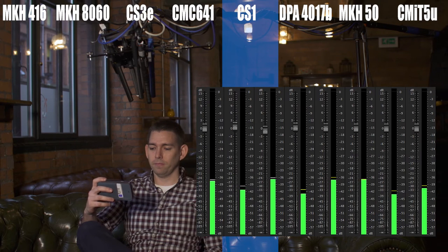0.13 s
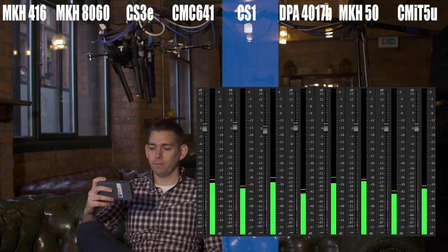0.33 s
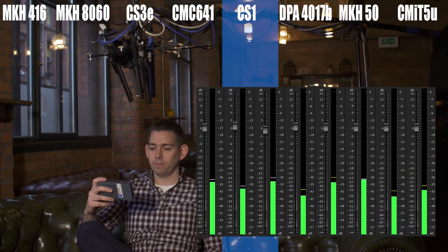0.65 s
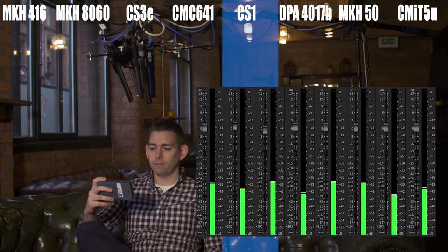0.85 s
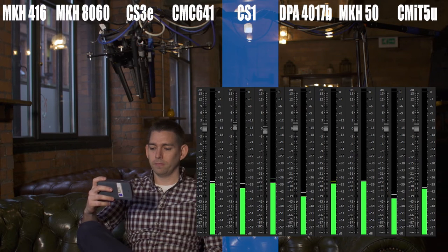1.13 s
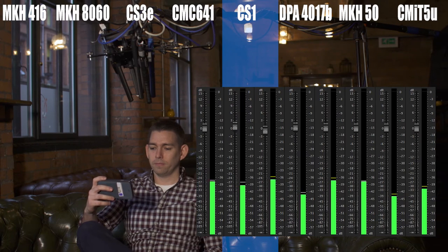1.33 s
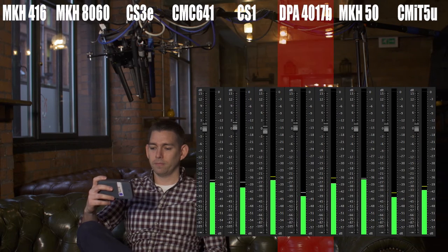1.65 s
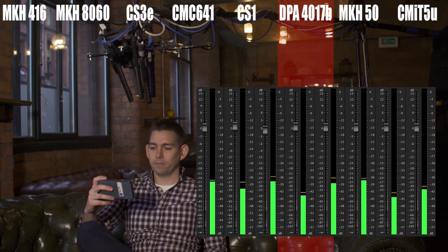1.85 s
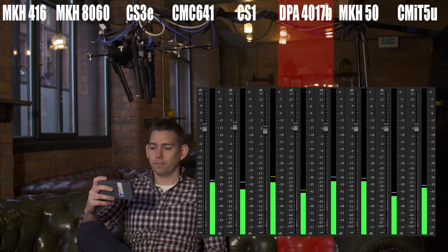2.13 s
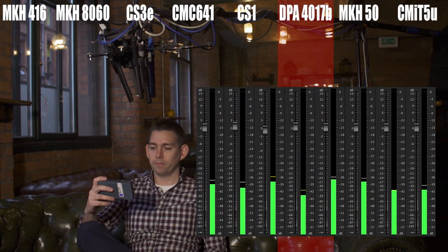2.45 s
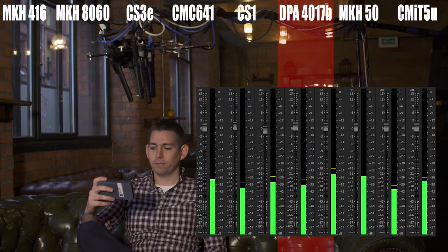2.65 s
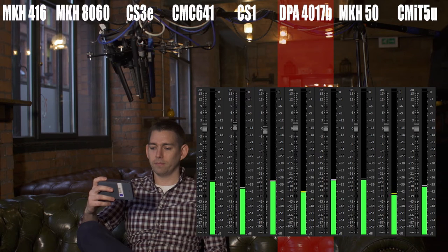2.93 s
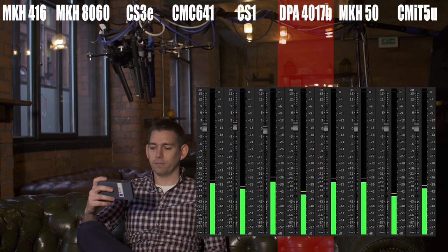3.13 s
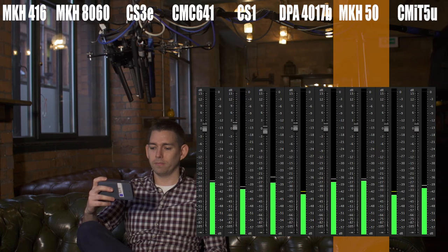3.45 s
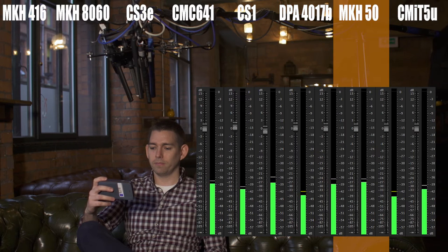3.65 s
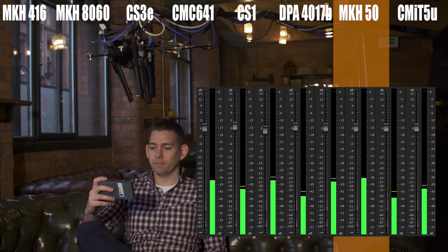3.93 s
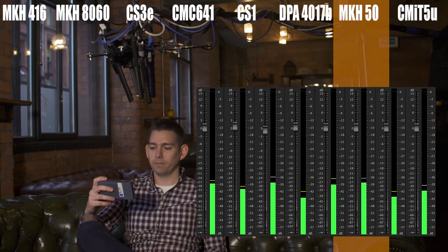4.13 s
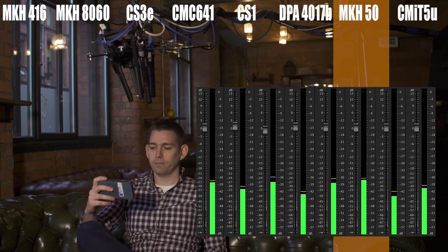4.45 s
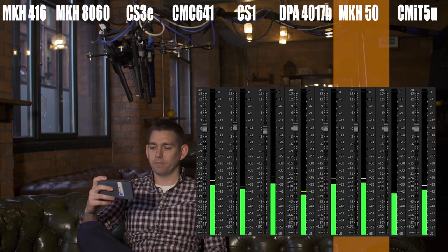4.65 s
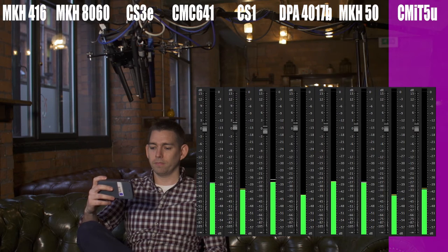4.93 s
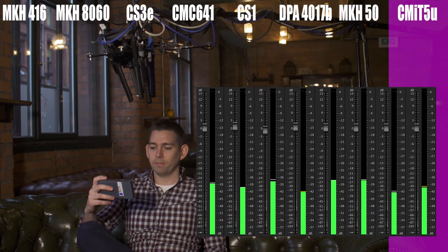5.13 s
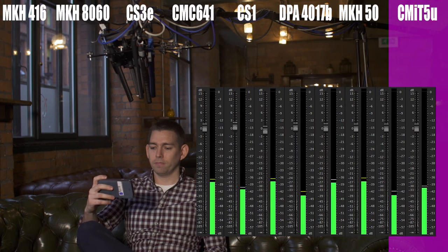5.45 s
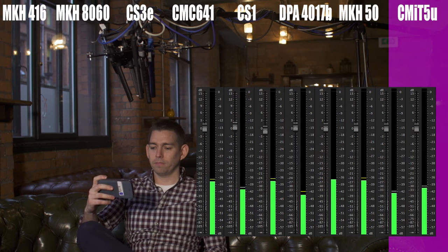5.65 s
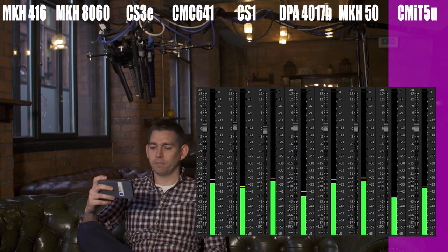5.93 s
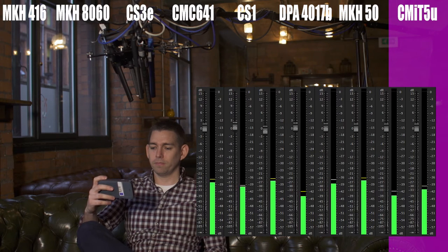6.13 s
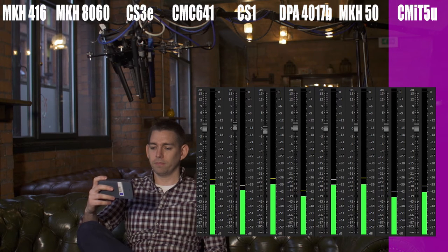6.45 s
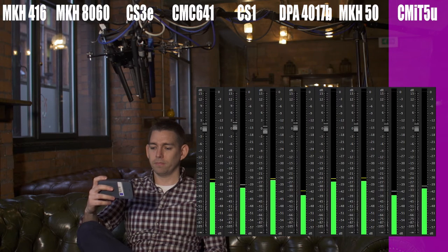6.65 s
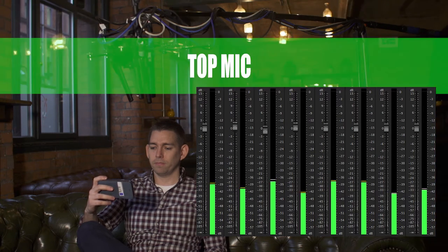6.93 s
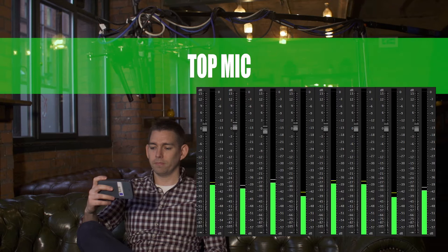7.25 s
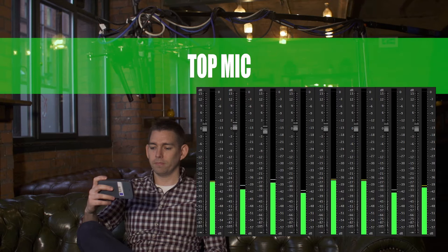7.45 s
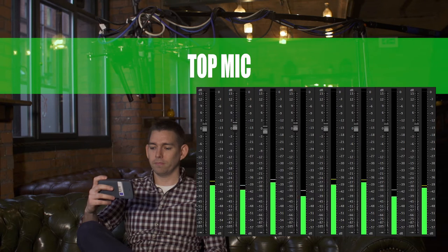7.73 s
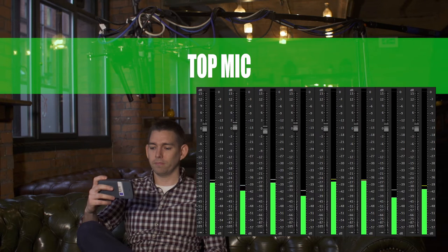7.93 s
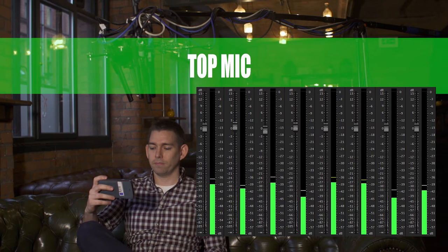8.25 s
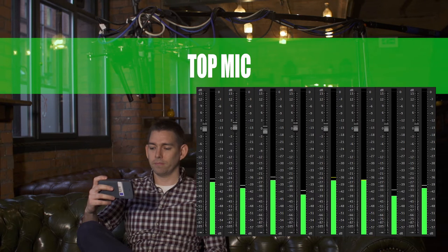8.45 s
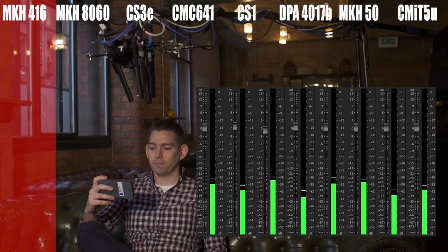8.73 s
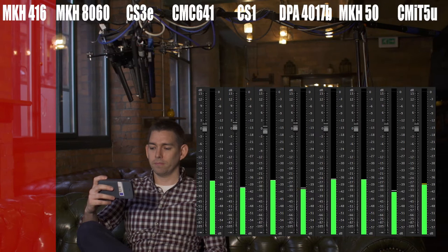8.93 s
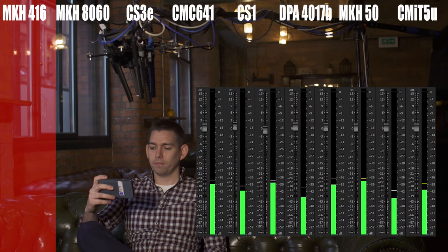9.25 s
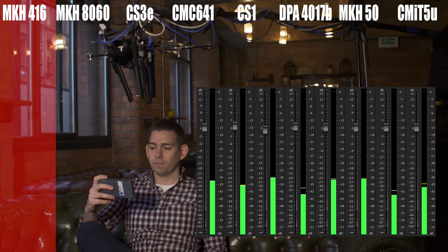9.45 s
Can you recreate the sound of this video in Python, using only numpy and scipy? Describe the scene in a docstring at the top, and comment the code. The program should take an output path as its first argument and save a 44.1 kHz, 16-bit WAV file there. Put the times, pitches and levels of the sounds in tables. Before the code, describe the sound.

Quiet room ventilation drone heard from changing microphone positions, with small clicks, two faint low thuds and a louder pulsing section before the end.

```python
"""A ceiling air conditioner in a quiet room, on six microphones in turn: summed sines hum, shaped noise hisses.
Short struck modes tick at 0.2 s; hard switches with a waveform jump follow at 1.5, 3.3 and 4.9 s.
Low decaying swings of the floor thud softly at 2.4 s and, fainter, at 5.4 s.
At 6.9 s the microphone across the room takes over: its hum beats strongly with a tone just below,
and high-passed noise swells briefly at 7.8 s. At 8.6 s the last switch returns to the edge of the cluster."""
import sys
import numpy as np
from scipy import signal
from scipy.fft import rfft, irfft
from scipy.io import wavfile

SR = 44100
rng = np.random.default_rng(int(sys.argv[2]) if len(sys.argv) > 2 else 0)


def pcm_store(signal):
    """Save signal as 16-bit PCM."""
    levels = np.round(np.clip(np.atleast_2d(signal), -1, 1) * 32767)
    wavfile.write(sys.argv[1], SR, levels.astype(np.int16).T)


N = 423360

# where each of the six microphones stands:
# 0 at the edge of the cluster overhead, 1 inside it, 2 across the room
MIC_SPOTS = [0, 1, 1, 1, 2, 0]
# the six microphones; all but the hum column colour only the air noise:
# (level [dB], rumble [dB], bass shelf [dB], boom [dB], treble shelf [dB], presence [dB],
#  top shelf [dB], bass cut [Hz], hum level [dB rms])
MICROPHONES = [(-1.5, 15, -0.6, 3, 1.1, -1.5, 2.5, 12, -44.5), (-3.5, -4, 3, 0.5, -1, 0.5, -6, 17, -41.5),
               (-3, 18, -2.5, -1.7, 0.1, 2, 5, 17, -53), (-2.5, 8, -0.2, -0.8, -1.5, -1, -0.5, 18, -47.5),
               (10, -3, -0.55, -1.5, 1.5, 0, -3, 43, -31.5), (-2.5, 6, -0.5, 1, 1, -0.1, 2, 26, -43)]
# motor tone above the hum, at each microphone: (level [dB rms])
MOTOR_LEVELS = [-55, -58, -62, -57.5, -48.5, -55]
# tone just under the hum, at each microphone: (level [dB rms])
BEAT_LEVELS = [-67, -65, -64.5, -72, -42.5, -73]
# fainter motor tones: (frequency [Hz], level at each of the six microphones [dB rms])
FAINT_TONES = [(28.05, -64, -68, -66, -72, -76, -74), (49.55, -66, -69, -71, -79, -70, -68),
               (91.05, -64, -71, -74, -69, -63, -66), (130.8, -68, -75, -84, -75, -72, -69),
               (192.4, -66, -67, -69, -68, -53, -74), (219.1, -67, -64.5, -66.5, -66, -70, -67),
               (200.06, -74, -74, -80, -80, -58, -76), (243.5, -69, -71, -74, -73, -66, -73),
               (273.5, -82, -79, -84, -79, -55, -79), (288.5, -75, -75, -78, -77, -62, -76)]
# faint electronic whines, heard only across the room: (frequency [Hz], level [dB rms])
ELECTRONIC_WHINES = [(9507, -95), (9781, -96), (12753, -101), (12920, -96), (14556, -102)]
# air rushing through the grille, before room and microphone colour: (frequency [Hz], density [dB per Hz])
GRILLE_SPECTRUM = [(20, -84), (40, -77.5), (80, -76), (140, -75.5), (230, -76), (400, -81.5), (600, -85.5),
                   (1000, -88.5), (1800, -95.5), (3000, -103.6), (5500, -111.5), (8000, -118.9),
                   (11000, -123.2), (15500, -125.8)]
# resonances of room and duct: (centre [Hz], full width at half lift [Hz], lift at each of the three spots [dB])
ROOM_DUCT_RESONANCES = [(50, 8.1, 7, -1.5, 0), (132.4, 10, 2, 1.5, -10), (131.6, 22, 5.5, -2, -5),
                        (142, 16, -3, -3, 6), (175, 27, 2.5, 2.5, -4.5), (174, 11, -7, 3, -1),
                        (206, 13, -3.5, -4.5, -1.5), (214.2, 8.2, -0.5, 0.5, 9.5), (228, 14, 2.5, -5, 4),
                        (243.4, 19.4, 4, 3, -1.5), (254, 12.3, 1.5, -1.5, -0.5), (260, 16, -1.5, 2.5, 7),
                        (289, 13, -4, -4, 0.5), (302, 16, 1, -1.5, -1), (322.7, 15.5, 6, 7, 1),
                        (325, 5.1, 3, 0.5, -3.5), (343, 12, -1, -2, 0), (357, 7.2, 2.5, 4.5, -1.5),
                        (373, 14, -3, -2, -3), (404, 55, 3, 3, 3), (416, 12, 0.5, 0.5, 2),
                        (458, 57, 2.5, 1.5, 5.5), (458, 12, 0, 0.5, 3), (479, 18, -3.5, -2.5, -4),
                        (511, 12, 1, -0.5, -4.5), (522, 33, -1.5, 1.5, 5), (561, 30, 1, 5, 1),
                        (575, 18, -3, -2, -6), (592, 10, -1.5, 0.5, 4), (626, 21, 0, -3.5, 3.5),
                        (666, 18, -1.5, 3.5, 3), (825, 220, 1.6, 0.5, 2), (1300, 400, 0.5, 0, -2),
                        (1730, 240, 1.5, 0.2, 3.5), (2760, 380, 0.5, 0.5, 1), (5800, 630, 1.5, 0.6, 1)]
# switching to the next microphone: (time [s], downward jump in the waveform [dB])
MIC_SWITCHES = [(1.5325, -58), (3.2926, -46), (4.9345, -46), (6.891, -36), (8.573, -44)]
# soft thuds through the floor: (time [s], gain [dB], rise constant [s], t60 [s])
FLOOR_THUDS = [(2.447, -42.5, .06, 0.75), (5.35, -50.5, .1, 0.7)]
# what the floor swings at: (frequency [Hz], relative level [dB], share of the thud's t60 [ratio])
FLOOR_SWINGS = [(25, -12, .6), (36.5, 0, 1), (54, -12, 1.6)]
# what the tick rings with: (frequency [Hz], gain [dB], t60 [s])
TICK_RINGS = [(1400, -49, .007), (1900, -46, .008), (2450, -51, .008), (3100, -54, .014)]
# treble swell: (noise gain before the high-pass [dB], rise constant [s], t60 [s], low edge [Hz])
HISS_SWELL = (-62, .006, .22, 8000)

ACROSS_ROOM = 2  # the far spot
HUM_HZ, MOTOR_HZ, BEAT_HZ = 100.03, 114.83, 96.15
BEAT_TOP_S = 7.6597
AIR_FLUTTER_DB, AIR_FLUTTER_HZ = 0.35, 4.8  # spread and rate
ROOM_T60_S, ROOM_DB, ROOM_DULL_HZ = .5, -14, 1500  # echo decay, level against direct sound, treble corner
BASS_SHELF_HZ, TREBLE_SHELF_HZ, TOP_SHELF_HZ = 350, 2010, 12400
# centres of three broad lifts, and their half widths where the lift falls to 1/e
RUMBLE_HZ, BOOM_HZ, PRESENCE_HZ = 28, 240, 4260
RUMBLE_OCTAVES, BOOM_OCTAVES, PRESENCE_OCTAVES = 0.2, 0.2, 0.82
SWITCH_BLEND_S = .003
TICK_S, TICK_RISE_S = .1992, .0004
HISS_SWELL_S = 7.783
CUTOFF_HZ = 15730


def motor_tones(mic, phases):
    """Steady sines sum and beat; the hum and the tone just under it are in step at the top of one beat."""
    t = np.arange(N) / SR - BEAT_TOP_S
    hum_db = MICROPHONES[mic][-1]
    out = amp(hum_db) * np.cos(2 * np.pi * HUM_HZ * t)
    out -= amp(MOTOR_LEVELS[mic]) * np.sin(2 * np.pi * MOTOR_HZ * t)
    out += amp(BEAT_LEVELS[mic]) * np.cos(2 * np.pi * BEAT_HZ * t)
    for (hz, *levels_db), phase in zip(FAINT_TONES, phases):
        out += amp(levels_db[mic]) * np.cos(2 * np.pi * hz * t + phase)
    if MIC_SPOTS[mic] == ACROSS_ROOM:
        for hz, db in ELECTRONIC_WHINES:
            out += amp(db) * np.sin(2 * np.pi * hz * t)
    return np.sqrt(2) * out  # rms to peak


def grille_air(mic):
    """Turbulent noise coloured by grille, resonances, room and this microphone, fluttering slightly."""
    hz = np.maximum(np.arange(N // 2 + 1) * SR / N, 1)
    colour_db = at_hz(GRILLE_SPECTRUM, hz) + response_db(mic, hz)
    for centre_hz, width_hz, *lifts_db in ROOM_DUCT_RESONANCES:
        lift_db = lifts_db[MIC_SPOTS[mic]]
        colour_db += lift_db / (1 + (2 * (hz - centre_hz) / width_hz) ** 2)
    per_hz = np.sqrt(SR / 2)  # white noise of spread 1 raised to 0 dB per Hz
    spectrum = rfft(rng.standard_normal(N)) * per_hz
    noise = irfft(spectrum * amp(colour_db) * room_echoes(hz), N)
    return noise * amp(AIR_FLUTTER_DB * drift(AIR_FLUTTER_HZ))


def room_echoes(hz):
    """Direct sound and a dull dying tail of echoes ripple the low spectrum finely, at mean power 1."""
    tail = rng.standard_normal(N) * amp(-60 * np.arange(N) / SR / ROOM_T60_S)
    echoes = rfft(tail) / np.sqrt(np.sum(tail ** 2))
    share = amp(ROOM_DB) / np.sqrt(1 + (hz / ROOM_DULL_HZ) ** 2)
    return (1 + share * echoes) / np.sqrt(1 + share ** 2)


def response_db(mic, hz):
    """A microphone's level, three shelves, three broad lifts and its bass cut, as heard on the air."""
    (level_db, rumble_db, bass_db, boom_db, treble_db,
     presence_db, top_db, cut_hz, _) = MICROPHONES[mic]
    shelves_db = bass_db / (1 + (hz / BASS_SHELF_HZ) ** 2)
    shelves_db += treble_db / (1 + (TREBLE_SHELF_HZ / hz) ** 2)
    shelves_db += top_db / (1 + (TOP_SHELF_HZ / hz) ** 12)
    lifts_db = rumble_db * bell(hz, RUMBLE_HZ, RUMBLE_OCTAVES)
    lifts_db += boom_db * bell(hz, BOOM_HZ, BOOM_OCTAVES)
    lifts_db += presence_db * bell(hz, PRESENCE_HZ, PRESENCE_OCTAVES)
    bass_cut_db = 10 * np.log10(1 + (cut_hz / hz) ** 8)
    return level_db + shelves_db + lifts_db - bass_cut_db


def switch_microphones(heard):
    """One microphone at a time; each switch makes the waveform jump, which clicks."""
    t = np.arange(N) / SR
    out = heard[0]
    for (start, jump_db), following in zip(MIC_SWITCHES, heard[1:]):
        after = np.clip((t - start) / SWITCH_BLEND_S, 0, 1)
        jump = amp(jump_db) * (t >= start) * (1 - after)
        out = out + after * (following - out) - jump
    return out


def floor_thuds():
    """The floor swings at a few low pitches and settles."""
    t = np.arange(N) / SR
    out = np.zeros(N)
    for start, db, rise, t60 in FLOOR_THUDS:
        for hz, mode_db, share in FLOOR_SWINGS:
            swing = np.sin(2 * np.pi * hz * (t - start))
            out += amp(db + mode_db) * swell(start, rise, t60 * share) * swing
    return out


def tick():
    """A few short modes struck once, softly; neighbours swing opposite ways."""
    t = np.maximum(np.arange(N) / SR - TICK_S, 0)
    rings = np.zeros(N)
    sign = -1
    for hz, db, t60 in TICK_RINGS:
        rings += sign * amp(db - 60 * t / t60) * np.sin(2 * np.pi * hz * t)
        sign = -sign
    return (1 - np.exp(-t / TICK_RISE_S)) * rings


def hiss_swell():
    """High-passed noise swells briefly and dies away."""
    db, rise, t60, low_hz = HISS_SWELL
    high_pass = signal.butter(2, low_hz, "high", fs=SR, output="sos")
    hiss = signal.sosfilt(high_pass, rng.standard_normal(N))
    return amp(db) * swell(HISS_SWELL_S, rise, t60) * hiss


def amp(db):
    """Decibels to gain."""
    return 10 ** (np.asarray(db) / 20)


def at_hz(points, hz):
    """A spectrum read on a log-frequency axis."""
    points_hz, points_db = np.array(points).T
    return np.interp(np.log(hz), np.log(points_hz), points_db)


def bell(hz, centre_hz, octaves):
    """A smooth hump of top 1 on a log-frequency axis."""
    return np.exp(-(np.log2(hz / centre_hz) / octaves) ** 2)


def drift(rate_hz):
    """Slow chance of spread 1: coarse noise through a double one-pole low-pass."""
    step = 100  # samples between coarse noise values
    pole = np.exp(-2 * np.pi * rate_hz * step / SR)
    coarse = rng.standard_normal(N // step + 1002)
    slow = signal.lfilter([1], [1, -2 * pole, pole * pole], coarse)[1000:]  # drop the filter's start
    return np.interp(np.arange(N) / step, np.arange(len(slow)), slow / slow.std())


def swell(start, rise, t60):
    """An envelope of top 1 that rises smoothly and dies away."""
    t = np.maximum(np.arange(N) / SR - start, 0)
    shape = (1 - np.exp(-t / rise)) ** 2 * amp(-60 * t / t60)
    return shape / shape.max()


def scene():
    """Six microphones hear the same unit in turn; the small events come on top."""
    phases = rng.uniform(0, 2 * np.pi, len(FAINT_TONES))
    heard = [motor_tones(mic, phases) + grille_air(mic) for mic in range(len(MICROPHONES))]
    mix = switch_microphones(heard) + floor_thuds() + tick() + hiss_swell()
    return mix[None, :]


def record(dry):
    """A steep elliptic low-pass cuts the top."""
    low_pass = signal.ellip(14, .3, 80, CUTOFF_HZ, fs=SR, output="sos")  # ripple .3 dB, stop 80 dB
    return signal.sosfilt(low_pass, dry)


dry = scene()
out = record(dry)
pcm_store(out)
```